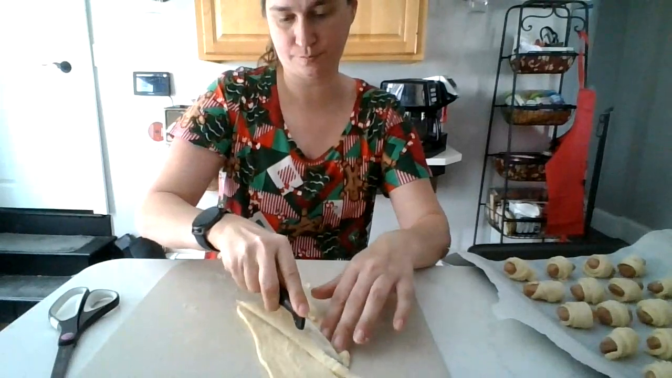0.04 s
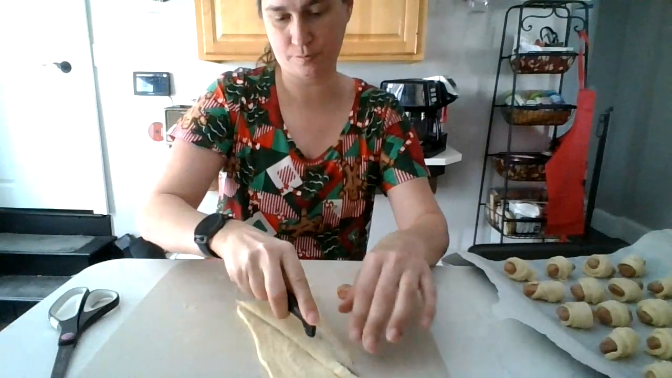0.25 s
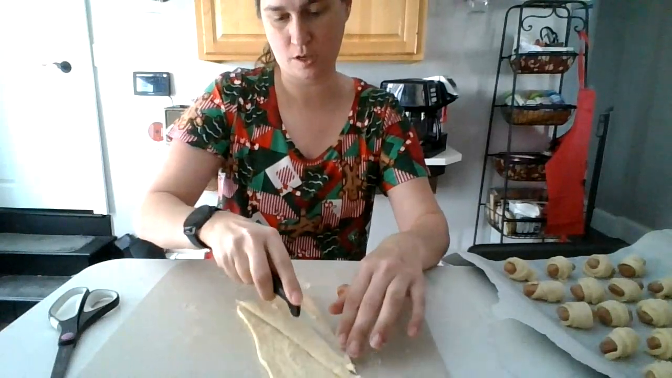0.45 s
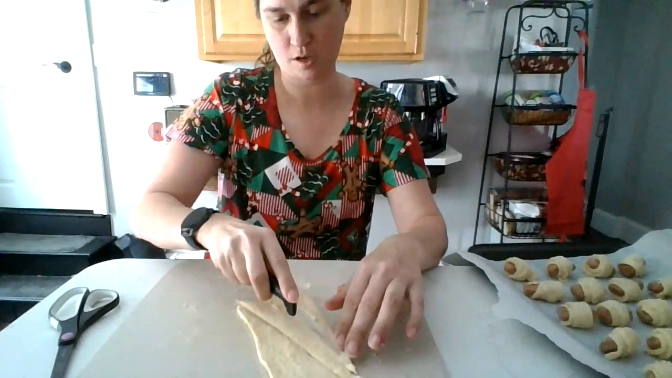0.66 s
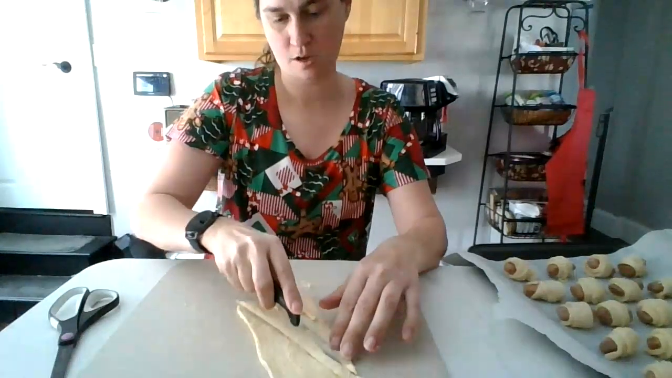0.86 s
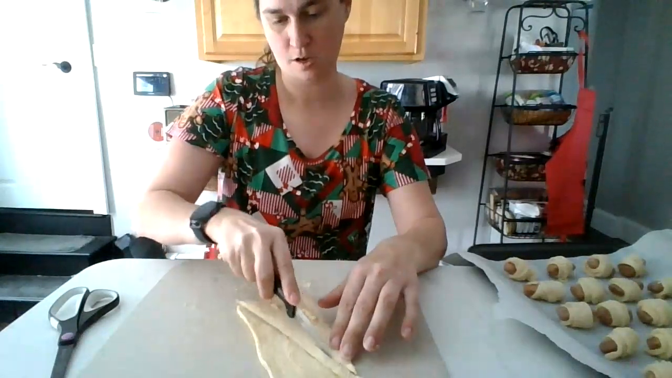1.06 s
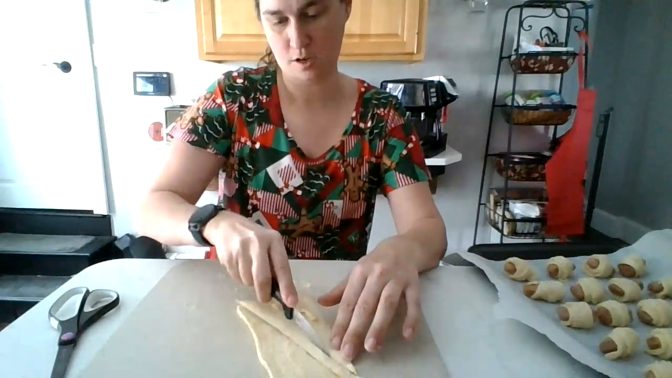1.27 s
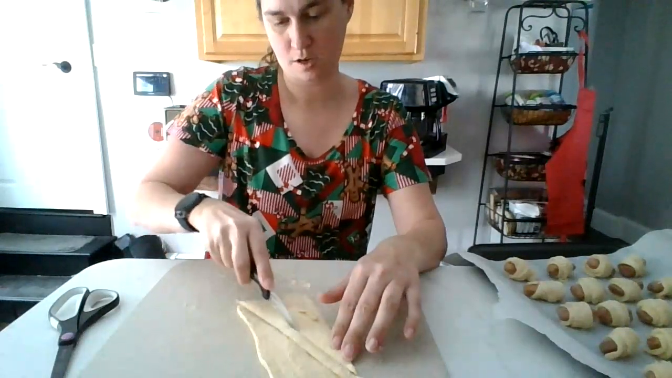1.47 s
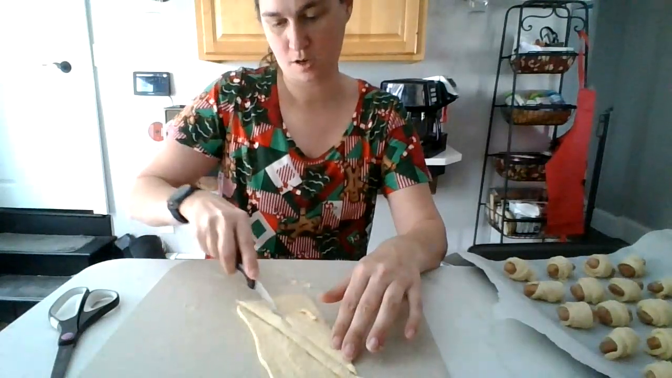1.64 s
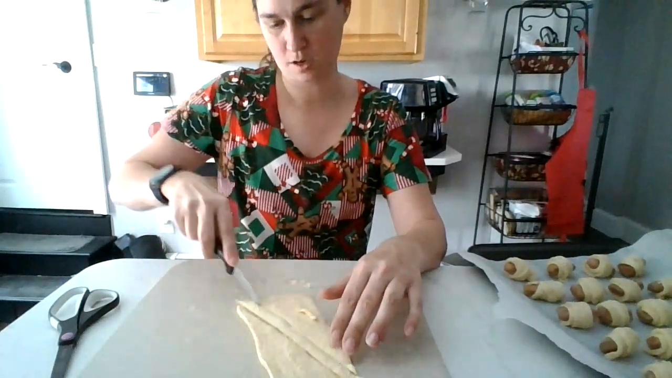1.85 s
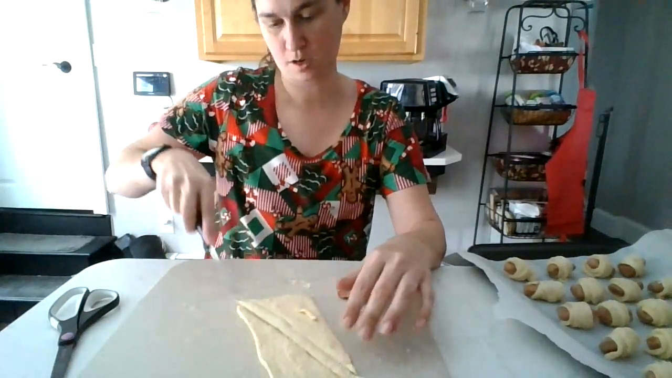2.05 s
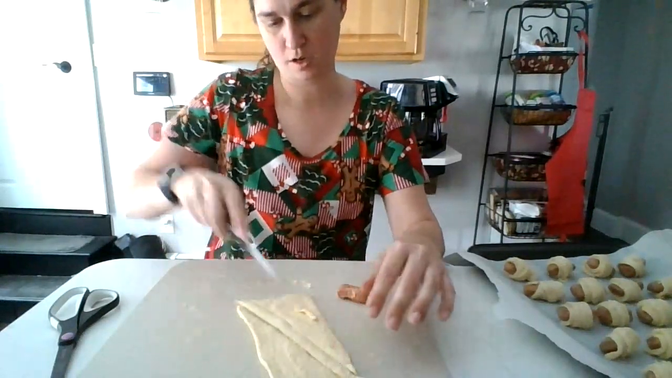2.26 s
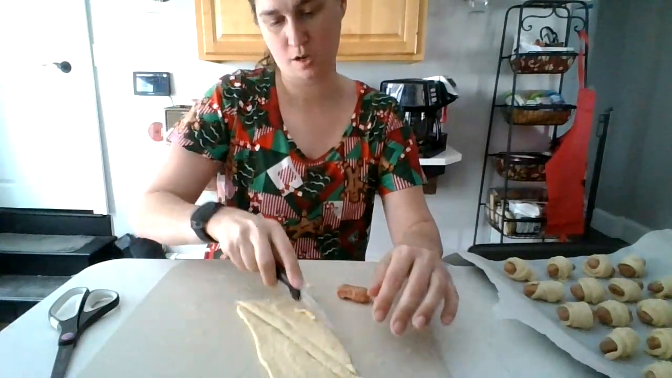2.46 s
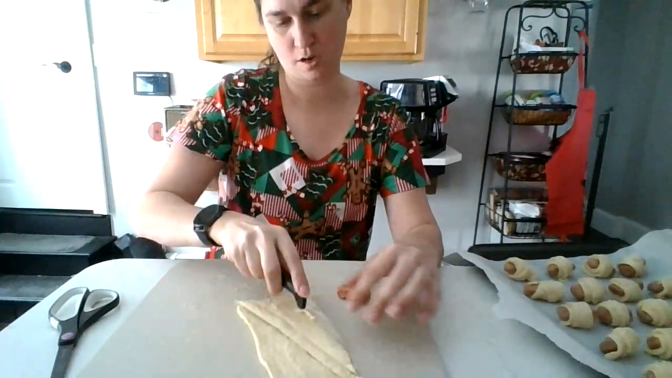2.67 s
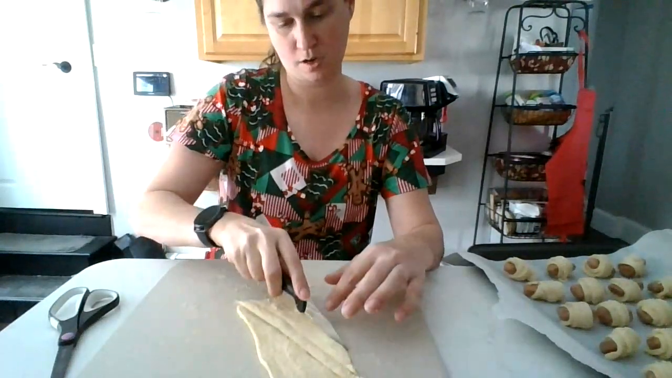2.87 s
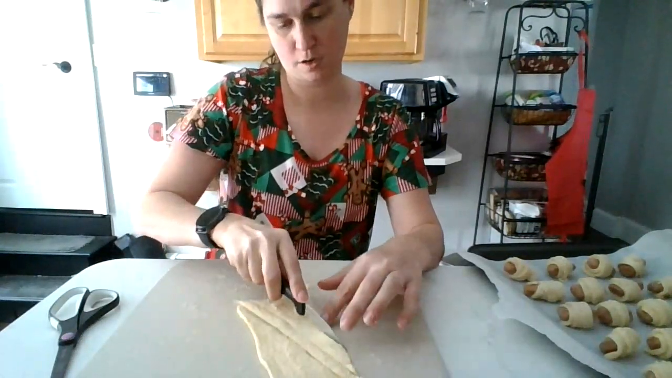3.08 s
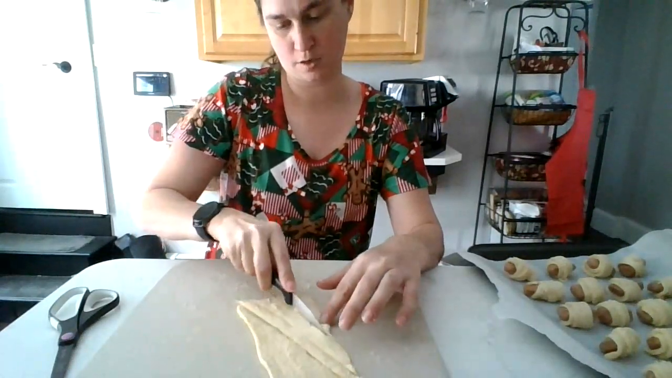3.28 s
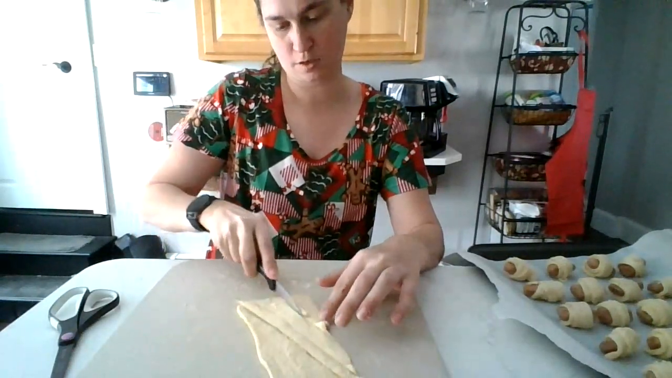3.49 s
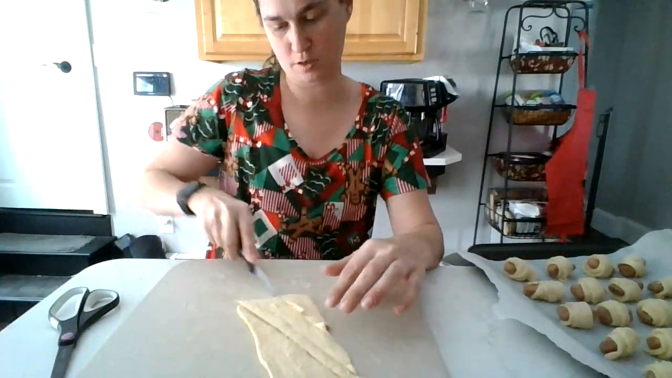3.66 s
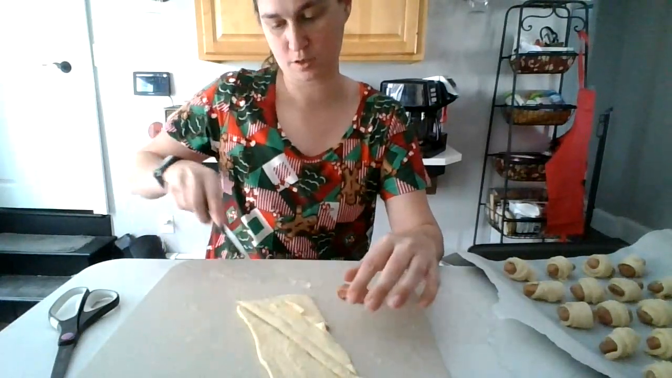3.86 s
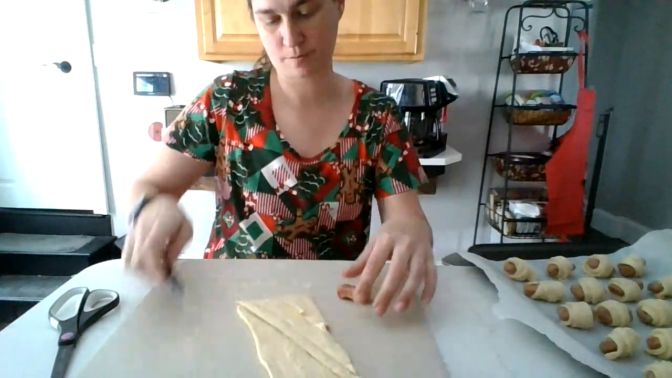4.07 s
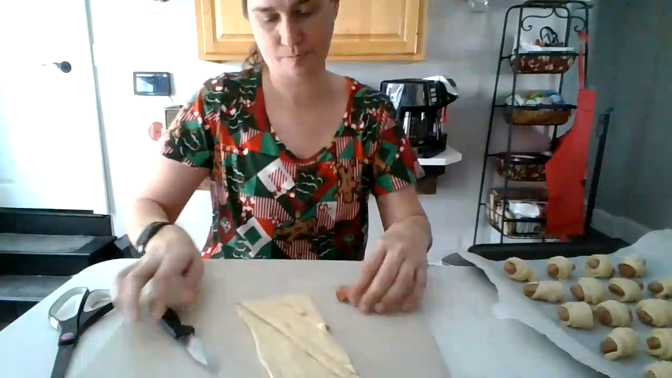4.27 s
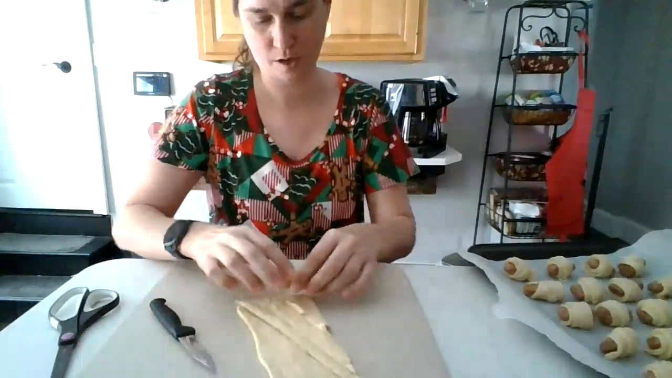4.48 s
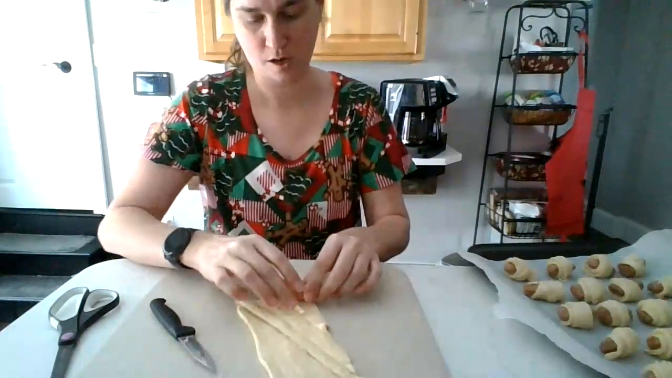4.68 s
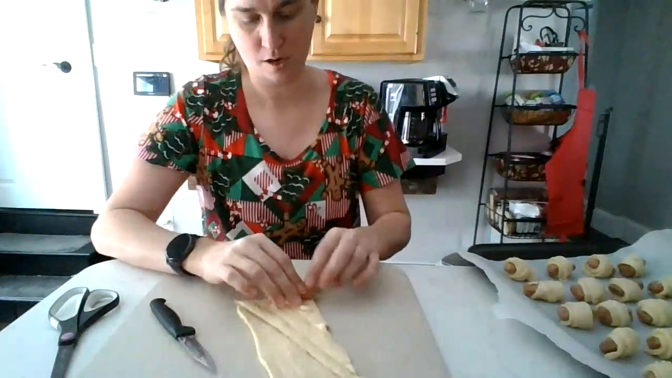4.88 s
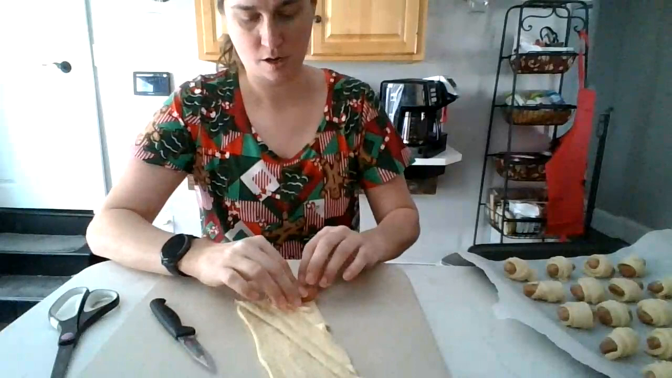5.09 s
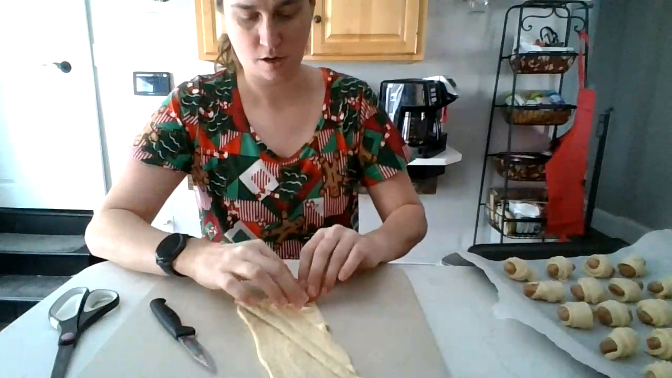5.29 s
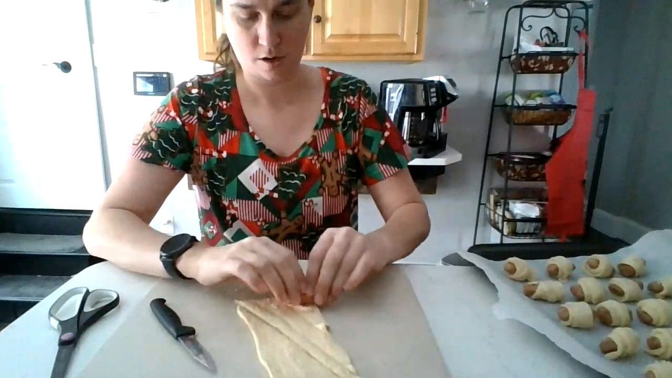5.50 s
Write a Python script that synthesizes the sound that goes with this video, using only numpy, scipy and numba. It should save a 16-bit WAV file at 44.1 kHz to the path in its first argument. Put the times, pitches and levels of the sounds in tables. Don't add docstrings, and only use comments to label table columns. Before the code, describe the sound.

Soft hand brushes and sticky dough ticks, two scraping knife cuts on plastic, then a loud double clack as the knife is put down.

```python
import sys
import numpy as np
from scipy import signal
from scipy.fft import rfft, irfft, next_fast_len
from scipy.io import wavfile
from scipy.ndimage import uniform_filter1d, minimum_filter1d
from numba import njit

SR = 44100
rng = np.random.default_rng(int(sys.argv[2]) if len(sys.argv) > 2 else 0)


def int16_out(signal):
    q = np.round(np.clip(np.atleast_2d(signal).T, -1, 1) * 32767)
    wavfile.write(sys.argv[1], SR, q.astype(np.int16))


def rack_gain(trim_db):
    fader = np.asarray(trim_db, float)
    return 10 ** (fader / 20)


N = 244086
T = np.arange(N) / SR

# shaft_multiple, level_db (rms)
SHAFT_ORDERS = [(1, -53.5), (2, -61), (3, -65), (4, -70), (5, -73.5), (6, -74)]
# pitch_hz, level_db (rms)
FAN_LINES = [(77.2, -87), (125.8, -73), (213, -71), (251.6, -74), (308.8, -81.5), (361, -77), (425.9, -76),
             (593, -81)]
# pitch_hz, level_db (per Hz)
AIR_SPECTRUM = [(2, 2.5), (13, -2.5), (22, -10), (40, -35), (120, -26), (400, -32), (520, -38.5),
                (1500, -42), (2400, -37.5), (3300, -42.5), (6000, -49), (7600, -48), (10000, -49),
                (16000, -50)]
# pitch_hz, likeness (0-1)
AIR_LIKENESS = [(8, 0.29), (60, 0.77), (300, 0.67), (1400, 0.53), (3500, 0), (5500, 0), (7800, 0.99),
                (15000, 0.98)]
# peak_s, peak_db, rise_s, fall_s, brightness_db
BRUSHES = [
    (.124, -63, .03, 0.24, 6),
    (.81, -62.5, 0.035, 0.087, -7),
    (1.16, -62.5, .15, 0.037, 0),
    (1.275, -67, .05, .05, -3),
    (2.2, -87, .04, .1, 2),
    (2.896, -46, .025, .17, -2),
    (3.95, -66, .08, 0.12, 14),
    (4.7, -71.5, .08, .08, -6),
    (5.21, -65, 0.018, 0.12, -4.5),
]
# time_s, edge_pressure_db, board_load_db, board_ring_hz
CUTS = [
    [(1.335, -88, -8, 2450), (1.355, -61.5, -8, 2550), (1.41, -56.5, -7, 2900), (1.64, -62.5, -10, 2610),
     (1.8, -62, -2, 2450), (1.835, -59, -7, 2320), (1.94, -58, 3, 2900), (2.09, -45.5, -0.5, 2300),
     (2.14, -77.5, 12.5, 2300)],
    [(3.12, -92, -7, 2450), (3.17, -63, -8, 2450), (3.33, -60.5, -13, 2680), (3.46, -56.5, -4, 2920),
     (3.55, -60, -3.5, 3020), (3.7, -50.5, -8.5, 3120), (3.79, -47.5, -8, 3000), (3.84, -50, -1.5, 2750),
     (3.875, -82, 0, 2500)],
]
# pitch_hz, width_hz, level_db
EDGE_PEAKS = [(7780, 700, -3), (9000, 810, -3.5), (6200, 1500, -3), (7500, 7000, 0.5)]
# ratio_to_ring, width_hz, level_db
BOARD_PEAKS = [(1, 412, 6.5), (1.15, 2230, 6)]
# pitch_hz, width_hz, level_db
THRUM_PEAKS = [(630, 65, 0), (900, 1400, -14.5), (900, 710, 2.5)]
# pitch_hz, width_hz, level_db
SPRAY_PEAKS = [(11200, 4600, 6), (15000, 6400, 7.5)]
# start_s, end_s, from_hz, to_hz, level_db (above hiss)
SINGING_BANDS = [(1.352, 1.6, 5500, 5400, -7), (1.603, 2.063, 5400, 5150, -8.5),
                 (1.399, 1.78, 9300, 9000, -9), (1.801, 1.92, 6600, 6700, -7.5),
                 (1.97, 2.135, 2600, 2250, -1), (1.948, 2.133, 620, 920, -4), (3.239, 3.72, 3880, 3250, -7),
                 (3.362, 3.542, 5500, 5800, -5), (3.526, 3.77, 6200, 6550, -3.5),
                 (3.572, 3.805, 5700, 5340, -5.5), (3.778, 3.847, 2770, 2740, -8),
                 (3.805, 3.877, 762, 743, -8), (3.925, 4.123, 8500, 8400, -4)]
# start_s, peak_db
FINGER_TAPS = [(0.2201, -51), (0.494, -62), (0.797, -56), (5.197, -56.5)]
# start_s, peak_db, pitch_hz
DOUGH_TICKS = [(0.3061, -43, 5140), (0.451, -43, 6000), (0.496, -53, 6350), (0.683, -48, 6600),
               (2.7718, -45.5, 7970), (2.778, -51, 7940), (2.802, -49, 7270), (2.8614, -60, 7970),
               (2.87, -53, 8150), (4.527, -47, 6830), (4.546, -48, 7150), (4.677, -48, 5100),
               (4.939, -53, 8000), (4.999, -44.5, 7760), (5.095, -42.5, 7820), (5.1114, -52.5, 8700),
               (5.349, -48, 7350)]
# start_s, blade_db, handle_db, contact_s, brightness_db (per octave)
BOUNCES = [(4.189, -42.5, -44.5, 0.0022, 0), (4.1916, -7.5, -18, 0.0013, -0.5),
           (4.1942, -13, -25, 0.00094, 5), (4.2015, -15, -26.5, 0.00066, -3.3),
           (4.2398, -45, -21.5, 0.0008, -2), (4.2697, -44, -21, 0.0027, -3.5),
           (4.2833, -5.5, -20, 0.0011, 2.6), (4.2845, -9.5, -27, 0.0008, 1.2),
           (4.2860, -14, -32, 0.0013, 0.5), (4.2893, -23, -34, .0012, -10),
           (4.300, -38.5, -30, 0.0016, 0.5), (4.368, -35, -32, 0.00074, -7)]
# pitch_hz, level_db
CRACK_SPECTRUM = [(200, -58), (1500, -22), (3500, -2.5), (4700, -2.5), (7000, 1), (9500, -1.5),
                  (11000, -5.5), (14000, -14), (16000, -26), (18000, -56)]
# pitch_hz, level_db, t60_s
BLADE_MODES = [(4500, 0.5, 0.016), (5360, 5.5, 0.013), (6140, 11, 0.0073), (7730, -3, 0.048),
               (8400, -16, 0.0074), (9300, 4, 0.024), (11400, -9, 0.019)]
# pitch_hz, level_db, t60_s
HANDLE_MODES = [(483, -11, .02), (741, -9, 0.02), (1165, -1, 0.018), (1520, 0, 0.015), (1890, 10.5, 0.0065),
                (2334, 13, 0.0049), (2900, -2, 0.0059)]
# pitch_hz, level_db, t60_s
COUNTER_MODES = [(130, 5, 0.044), (207, 4, 0.049), (324, -10.5, .04)]
# pitch_hz, t60_s
KITCHEN_DECAY = [(250, 0.35), (500, 0.68), (1000, 0.46), (2000, 0.41), (4000, 0.41), (8000, .3),
                 (11000, 0.14), (15000, 0.23)]
# pitch_hz, likeness (0-1)
TAIL_LIKENESS = [(300, 0.77), (1000, 1), (2500, 0.48), (5500, 0), (7500, 0.65), (15000, 0.8)]
# pitch_hz, level_db
PORT_SHADING = [(100, -0.5), (700, 0.5), (3500, -1), (5000, -5), (7500, -10), (9000, -4.5), (10500, 5.5),
                (13000, 9), (16000, -9.5)]


def level(x, db):
    return x * rack_gain(db) / np.sqrt(np.mean(x ** 2))


def on_log(table, hz):
    points = np.array(table)
    return np.interp(np.log(hz + 0.00099), np.log(points[:, 0]), points[:, 1])


def shape(x, gain):
    size = next_fast_len(x.shape[-1], True)
    spectrum = rfft(x, size) * gain(np.fft.rfftfreq(size, 1 / SR))
    return irfft(spectrum, size)[..., :x.shape[-1]]


def low_cut(hz, cutoff_hz, power):
    return 1 / np.sqrt(1 + (cutoff_hz / (hz + 1e-3)) ** power)


@njit
def svf(x, hz, width):
    y, band, low = np.empty(len(x)), 0., 0.
    for i in range(len(x)):
        g, k = np.tan(np.pi * hz[i] / SR), width / hz[i]
        v = (band + g * (x[i] - low)) / (1 + g * (g + k))
        band, low, y[i] = 2 * v - band, low + 2 * g * v, k * v
    return y


def walk(rate):
    hold = int(SR / rate)
    steps = np.repeat(rng.standard_normal(N // hold + 1), hold)
    return 1.03 * uniform_filter1d(uniform_filter1d(steps, hold), hold)[:N]


def pair(size, likeness):
    like = lambda hz: np.clip(on_log(likeness, hz), 0, 1)
    mid = shape(rng.standard_normal(size), lambda hz: np.sqrt(1 + like(hz)))
    side = shape(rng.standard_normal(size), lambda hz: np.sqrt(1 - like(hz)))
    return np.array([mid + side, mid - side])


def ring(modes, contact_s, tilt_db=0., soft_s=1e-6):
    t = T[:SR // 8]
    body = np.zeros(len(t))
    for hz, db, t60 in modes:
        chance_level, chance_pitch = rng.standard_normal(2)
        gain = rack_gain(db + 4.4 * chance_level + tilt_db * np.log2(hz / 6000))
        body += gain * np.sin(2 * np.pi * hz * (1 + 0.022 * chance_pitch) * t) * 1000. ** (-t / t60)
    touch = rng.standard_normal(256) * np.exp(-T[:256] / contact_s * 2)
    touch[0] = 3
    out = signal.fftconvolve(body * np.clip(t / soft_s, 0, 1), touch)
    return out / np.abs(out).max()


def add(track, sound, s):
    i = int(s * SR)
    track[i:i + len(sound)] += sound[:N - i]


def fridge():
    shaft_hz, mains_hz, mains_db = 29.885, 60.16, -62
    t = T - 1.95
    out = rack_gain(mains_db) * np.cos(2 * np.pi * mains_hz * t)
    for k, db in SHAFT_ORDERS:
        out += rack_gain(db + 0.94 * walk(1.78)) * np.cos(2 * np.pi * k * shaft_hz * t + k * k - 4)
    for hz, db in FAN_LINES:
        out += rack_gain(db + 2.93 * walk(5)) * np.cos(2 * np.pi * hz * t + 1.52 * walk(5.0))
    return np.sqrt(.5) * out * rack_gain(np.array([[-.8], [.8]]))


def air():
    noise = pair(N, AIR_LIKENESS)
    return level(shape(noise, lambda hz: rack_gain(on_log(AIR_SPECTRUM, hz))), -53)


def gestures():
    s, *columns = np.transpose(np.vstack(CUTS))
    press_db, load_db, ring_hz = (np.interp(T, s, column) for column in columns)
    thrum_db = -11 + 1.44 * load_db
    spray_db = -15 + 0.3 * (press_db + 52)
    gains = rack_gain(press_db + np.array([0 * T, load_db, thrum_db, spray_db]))
    for s, db, rise_s, fall_s, bright_db in BRUSHES:
        outline = rack_gain(db - 20 * np.maximum((s - T) / rise_s, (T - s) / fall_s))
        gains = gains + outline * rack_gain(np.array([[0], [-5], [-3.5 - bright_db], [-10.5 + bright_db]]))
    knead_s, knead_rise_s, knead_db, knead_ring_hz = 4.5, 0.1, -71, 2050
    knead = np.clip((T - knead_s) / knead_rise_s, 0, 1) * rack_gain(knead_db + 0.7 * walk(6.32))
    gains = gains + knead * rack_gain(np.array([[0], [0], [0.5], [-4.5]]))
    return gains, np.where(T > knead_s, knead_ring_hz, ring_hz)


def sing(slips):
    out = np.zeros(N)
    for start, end, from_hz, to_hz, db in SINGING_BANDS:
        width = 0.97 * (160 + 0.055 * from_hz)
        part = np.roll(slips, rng.integers(N))[:int((end - start) * SR)]
        glide = np.linspace(from_hz, to_hz, len(part))
        centre = glide * (1 + 0.025 * walk(25)[:len(part)])
        band = level(svf(svf(part, centre, width), centre, width), db)
        add(out, band * signal.windows.tukey(len(part), .4), start)
    return out * rack_gain(3.1 * walk(30))


def slip_body(slips, peaks, scale=0.95):
    wander, flicker_db = 0.041, 1
    centres = [hz * scale * (1 + wander * walk(5.865)) for hz, _, _ in peaks]
    out = np.zeros(N)
    for centre, (_, width, db) in zip(centres, peaks):
        gain = rack_gain(db + flicker_db * walk(24.89)) / np.sqrt(width)
        own_slips = np.roll(slips, rng.integers(N))
        out += gain * svf(svf(own_slips, centre, 3.3 * width), centre, 2.17 * width)
    return level(out, 0)


def rubbing():
    slip_rate_hz, scatter_db, judder_db = 9000, 2.0, 2
    (hiss, board, thrum, spray), ring_hz = gestures()
    slips = (rng.random(N) < slip_rate_hz / SR) * rng.standard_normal(N)
    slips = slips * rack_gain(scatter_db * rng.exponential(size=N))
    out = hiss * (slip_body(slips, EDGE_PEAKS, 0.97) + sing(slips))
    out += board * slip_body(slips, BOARD_PEAKS, ring_hz)
    out += thrum * slip_body(slips, THRUM_PEAKS)
    out += spray * slip_body(slips, SPRAY_PEAKS)
    return rack_gain(-9.5 + judder_db * walk(45)) * out


def fingers():
    out = np.zeros(N)
    tap_modes = [(564, -0.5, 0.014), (1210, -2.0, 0.012), (1610, -9.0, 0.0073)]  # pitch_hz, level_db, t60_s
    for s, db in FINGER_TAPS:
        add(out, rack_gain(db + 2.2) * ring(tap_modes, 0.00052, soft_s=0.00033), s)
    for s, db, hz in DOUGH_TICKS:
        modes = [(hz, 0, .004), (1.5 * hz, -5, .003), (1.7 * hz, -9, .002), (0.74 * hz, -8, .003)]
        add(out, rack_gain(db - 7) * ring(modes, 0.0001, soft_s=0.00019), s)
    return out


def crack(contact_s, tilt_db):
    lead_s = .001
    t = T[:1024] - lead_s
    outline = (t > 0) * np.exp(-(np.maximum(t, contact_s) / contact_s - 1) * 2)
    burst = rng.standard_normal(len(t))
    for _ in range(4):
        even = burst / (uniform_filter1d(np.abs(burst), size=21) + 1e-9)
        spread = rfft(even * outline)
        burst = irfft(spread / np.abs(spread))
    colour = lambda hz: rack_gain(on_log(CRACK_SPECTRUM, hz) + tilt_db * np.log2(hz / 6000 + .2))
    out = shape(burst * np.sqrt(outline), colour)[int(lead_s * SR) - 8:]
    return out / np.abs(out).max()


def knife_drop(bounces):
    out = np.zeros(N)
    for s, blade_db, handle_db, contact_s, tilt_db in bounces:
        add(out, rack_gain(blade_db) * crack(contact_s, tilt_db), s)
        add(out, rack_gain(blade_db - 7.5) * ring(BLADE_MODES, contact_s / 2, tilt_db), s)
        add(out, rack_gain(handle_db) * ring(HANDLE_MODES, contact_s / 4, soft_s=0.00033), s)
    return out


def thud():
    out = np.zeros(N)
    add(out, rack_gain(-42) * ring(COUNTER_MODES, .001), 4.284)
    return out


def housing(x):
    scatter_db, scatter_s, low_hz = -9.5, 0.0026, 1900
    scatter = rng.standard_normal(256) * np.exp(-T[:256] / scatter_s)
    scatter = scatter * rack_gain(scatter_db) / np.sqrt(np.sum(scatter ** 2))
    treble = shape(x, lambda hz: low_cut(hz, low_hz, 4))
    side = signal.fftconvolve(treble, scatter)[:N]
    return np.array([x + side, x - side])


def kitchen(x):
    tail_db, gap_s = -8, 0.0062
    t = T[:SR // 2]
    tail = 0
    for hz in 250 * 2 ** np.arange(0, 6.1, .5):
        half_octave = lambda f: np.exp(-(np.log2(f / hz + 1e-9) / 0.42) ** 2)
        band = shape(pair(len(t), TAIL_LIKENESS), half_octave)
        tail = tail + band * 1000. ** (-t / on_log(KITCHEN_DECAY, hz))
    tail = tail * np.clip(t / gap_s - .3, 0, 1)
    tail = tail * rack_gain(tail_db) / np.sqrt(np.sum(tail ** 2) / 2)
    return signal.fftconvolve(x[None], tail, axes=1)[:, :N]


def scene():
    near = rubbing() + fingers()
    odd_bounces, even_bounces = knife_drop(BOUNCES[::2]), knife_drop(BOUNCES[1::2])
    direct = housing(near + odd_bounces + even_bounces)
    left, right = direct + kitchen(rack_gain(-2) * near + odd_bounces) + kitchen(even_bounces)
    left_lag, lag_top_hz = 2, 5500
    late = lambda hz: np.exp(-2j * np.pi * hz * left_lag / SR / (1 + (hz / lag_top_hz) ** 6))
    thin = lambda hz: low_cut(hz, 400, 6)
    left = shape(left, lambda hz: late(hz) * thin(hz) * rack_gain(on_log(PORT_SHADING, hz) / 2))
    right = shape(right, lambda hz: thin(hz) * rack_gain(-on_log(PORT_SHADING, hz) / 2))
    return np.array([left, right]) + thud() + fridge() + air()


def roll_off(x):
    return signal.sosfilt(signal.butter(12, 15980, fs=SR, output="sos"), x)


def record(dry):
    duck_share, release_s, top_hz = 0.7, 0.01, 15750
    excess = 1 - np.minimum(1, duck_share / (np.abs(dry).max(axis=0) + 1e-9))
    held = -uniform_filter1d(minimum_filter1d(-excess, size=301), size=101)
    keep = np.exp(-1 / (release_s * SR))
    gain = 1 - np.maximum(held, signal.lfilter([1 - keep], [1, -keep], held))
    band = shape(2 * dry * gain, lambda hz: 1 / np.sqrt(1 + (hz / top_hz) ** 120))
    return roll_off(np.clip(band, -1, 1))


dry = scene()
out = record(dry)
int16_out(out)
```